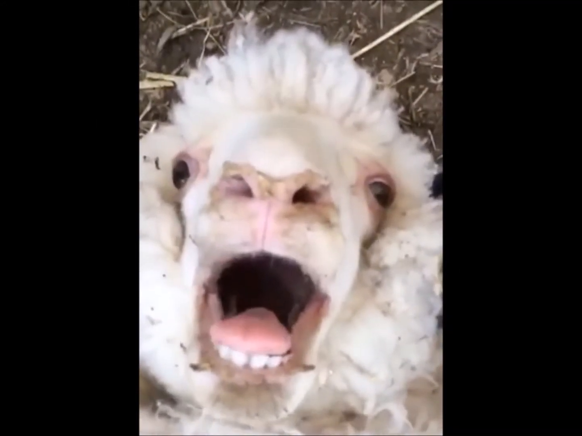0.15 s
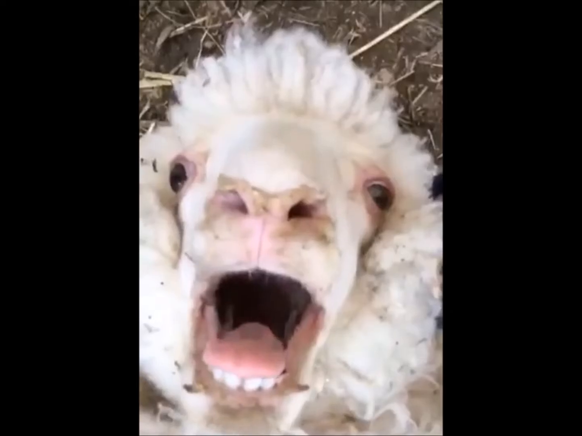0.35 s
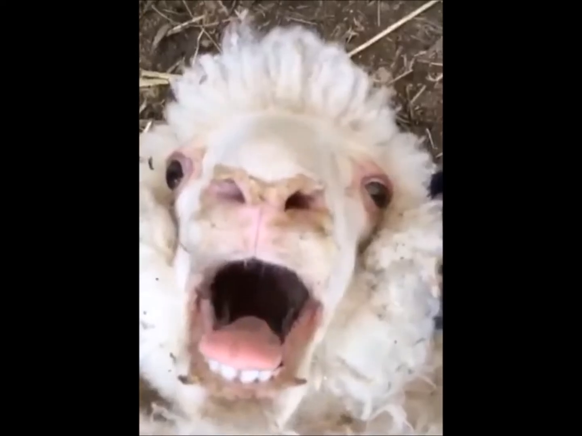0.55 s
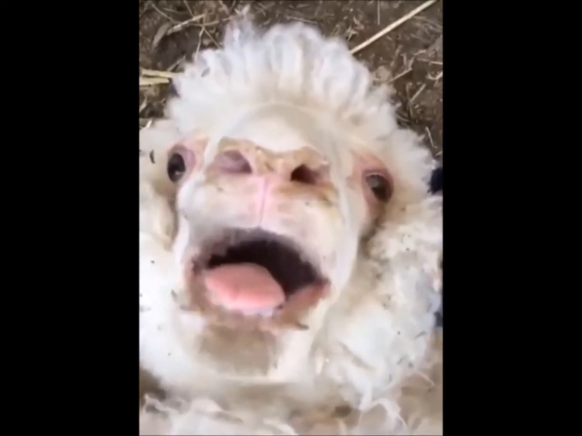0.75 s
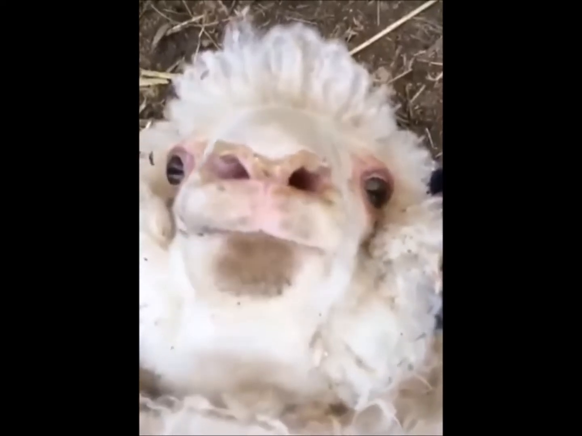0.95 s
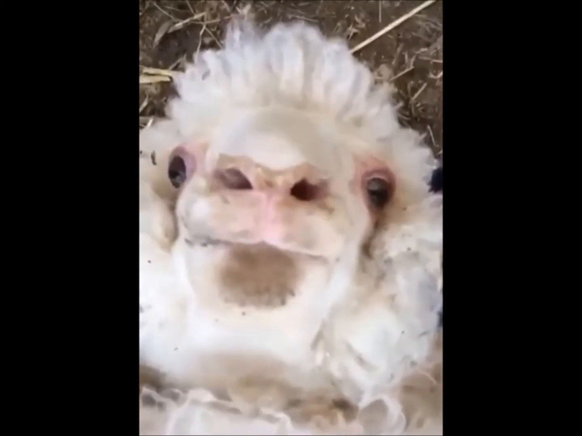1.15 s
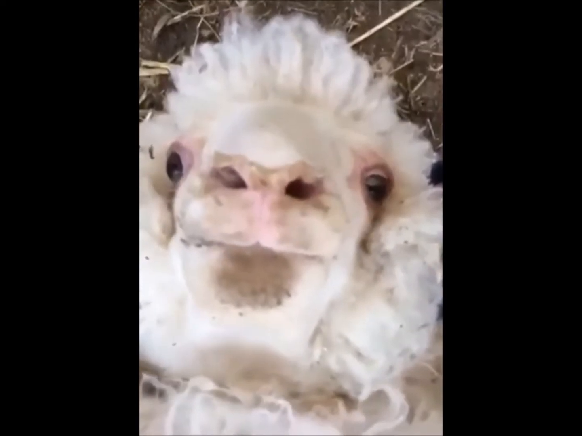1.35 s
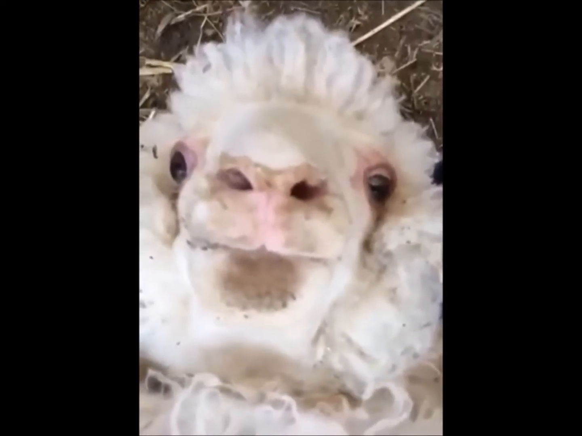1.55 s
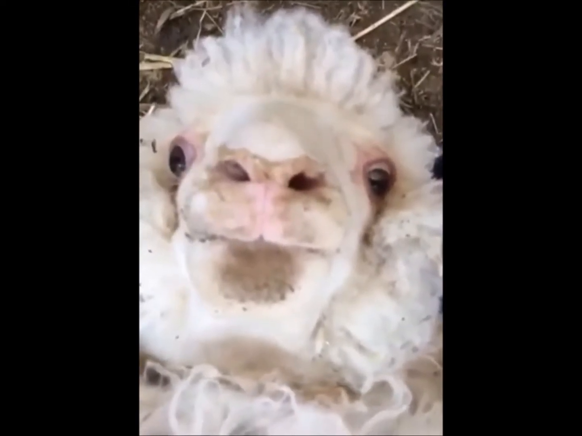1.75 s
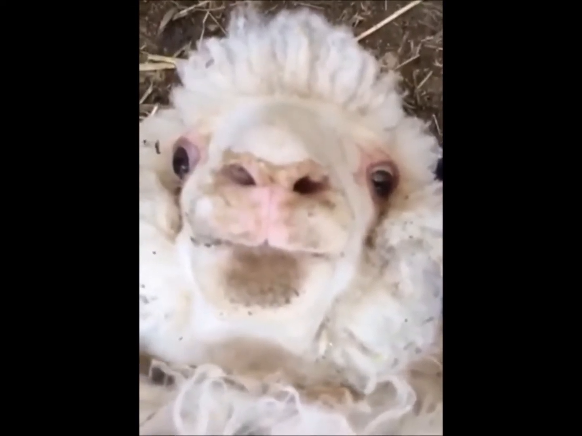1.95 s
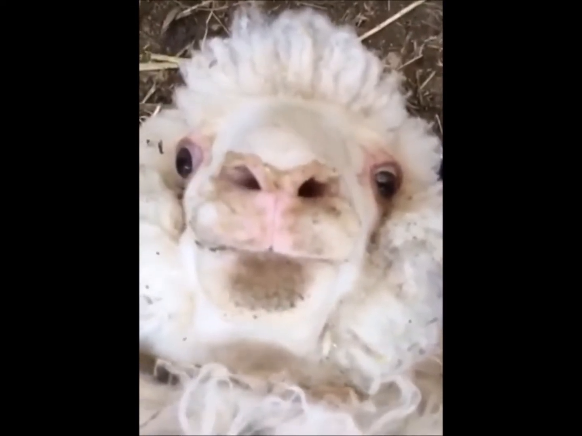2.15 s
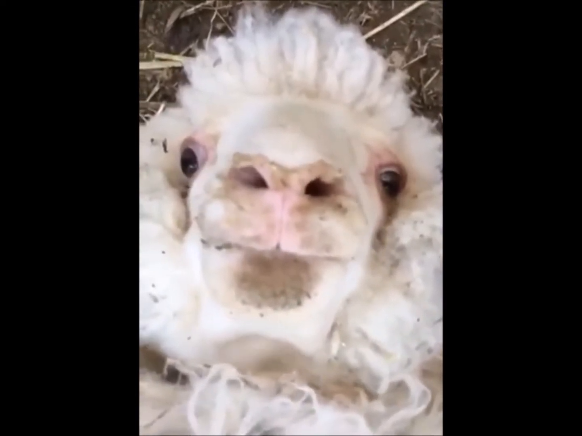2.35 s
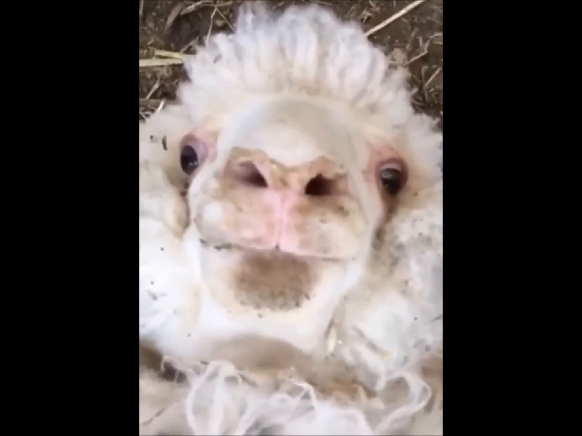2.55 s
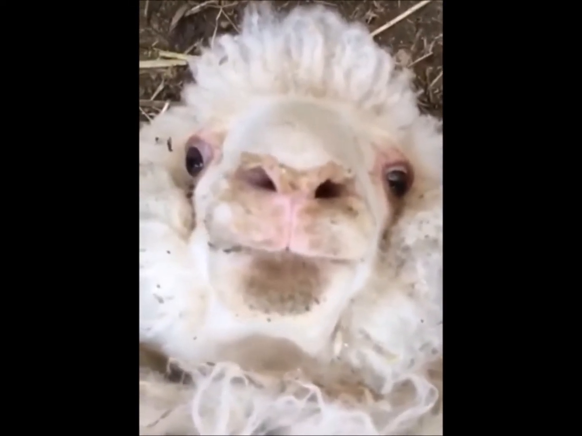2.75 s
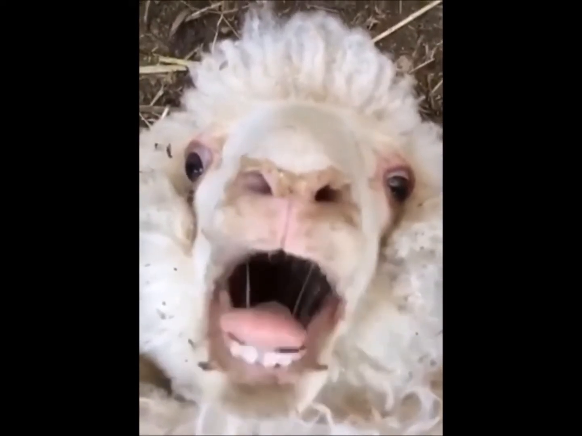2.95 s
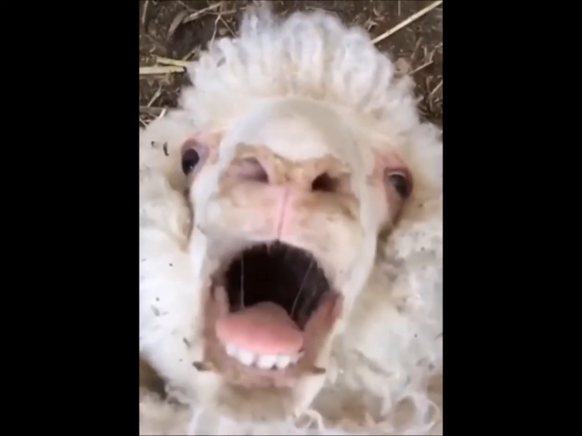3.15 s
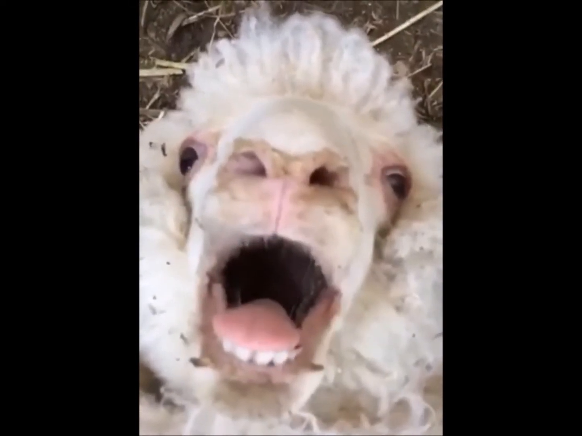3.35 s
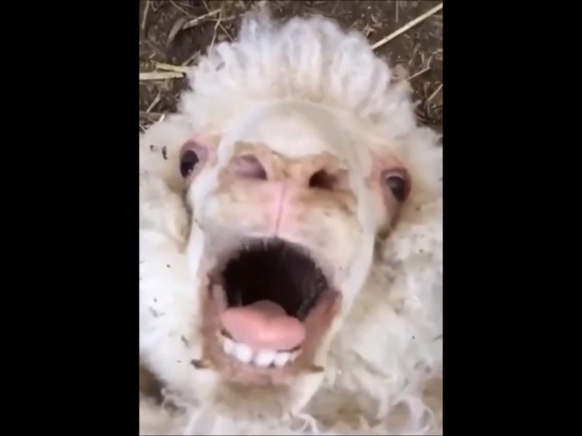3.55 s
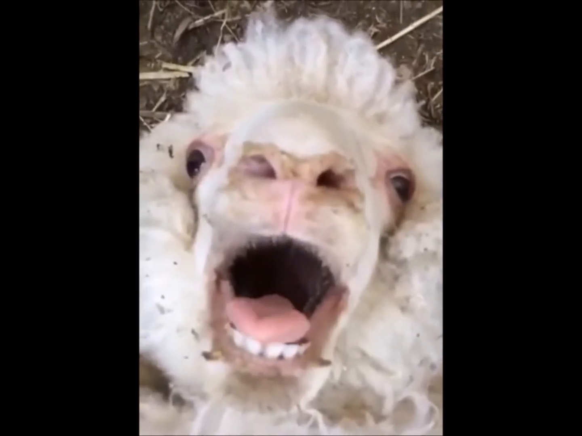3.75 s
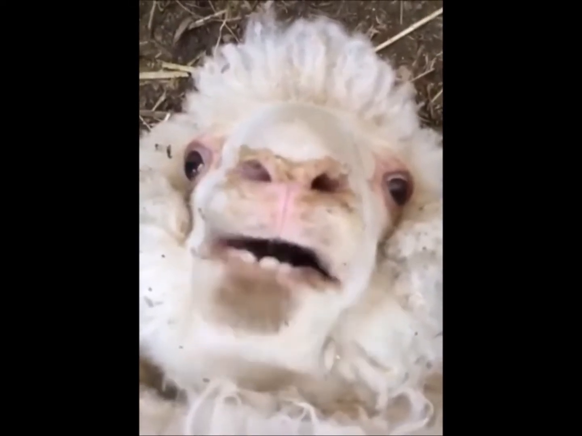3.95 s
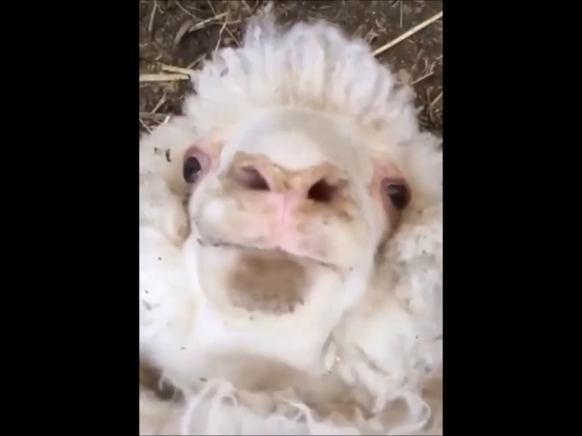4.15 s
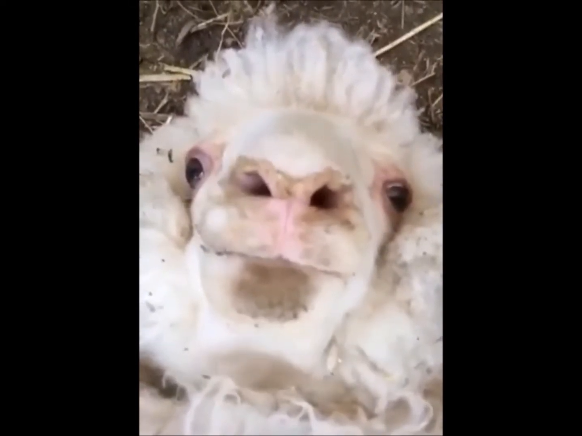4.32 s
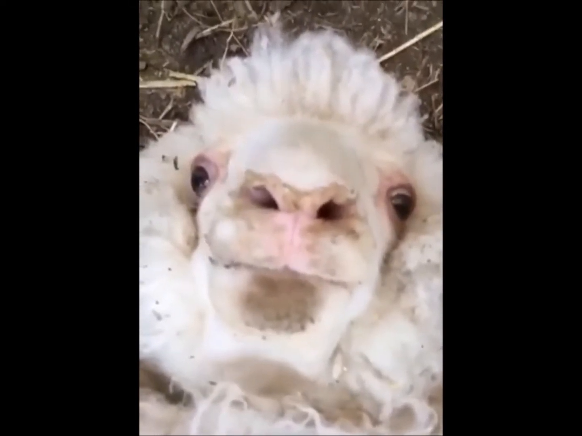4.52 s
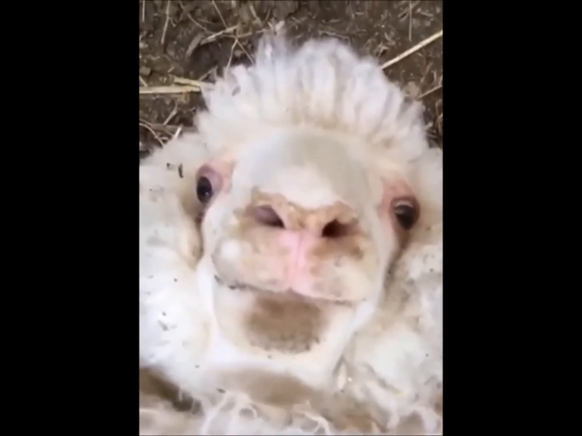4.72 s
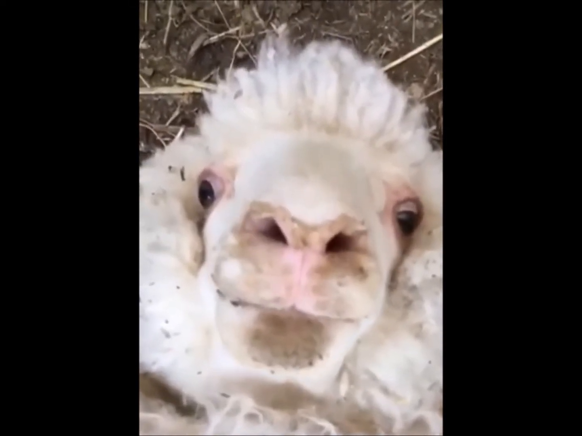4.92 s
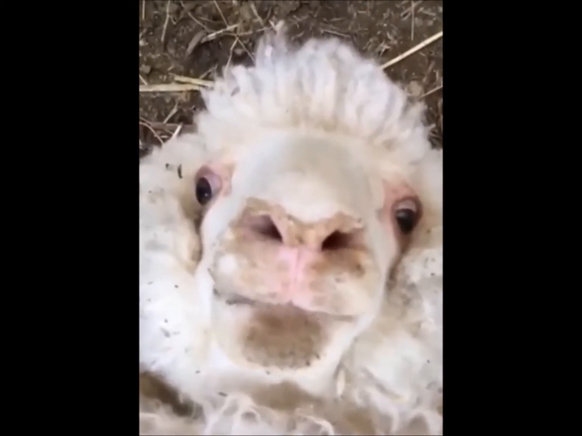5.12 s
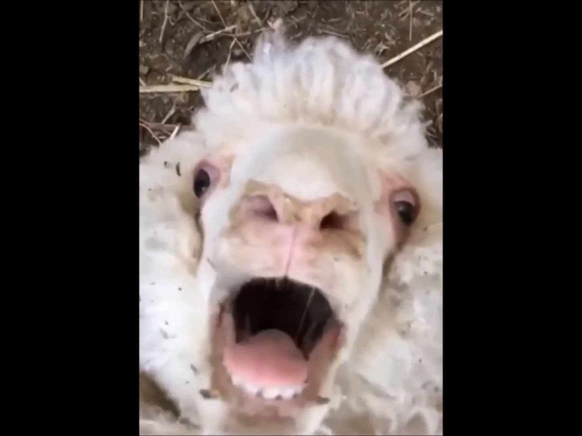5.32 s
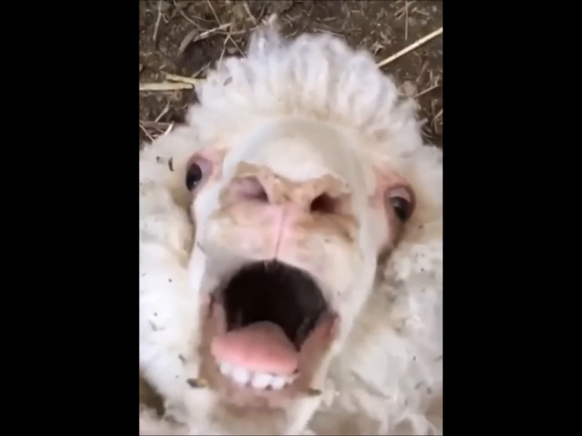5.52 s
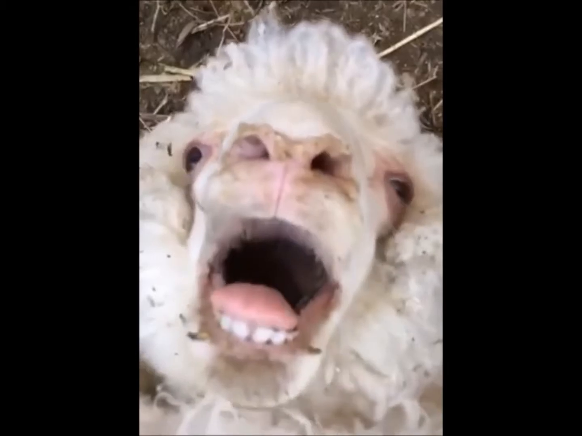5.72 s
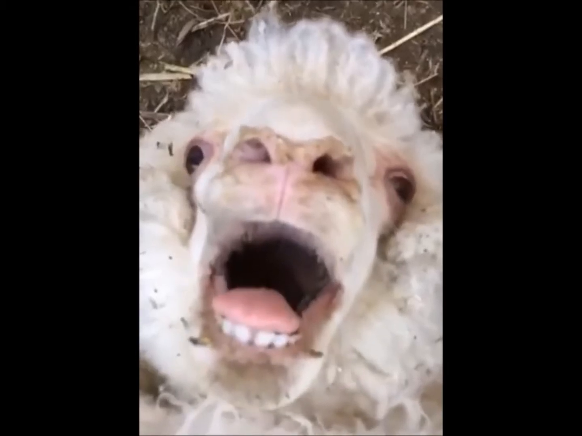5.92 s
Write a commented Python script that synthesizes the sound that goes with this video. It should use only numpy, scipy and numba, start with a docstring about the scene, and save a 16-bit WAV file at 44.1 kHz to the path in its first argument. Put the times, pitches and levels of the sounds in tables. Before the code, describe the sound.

Very close and with almost no echo, a sheep yells a long, buzzing bleat. It then snuffles quietly, with a small snort, little wet mouth sounds and soft thumps. A second loud bleat opens with a rough rattle and smooths into a held tone. After a low thump and more snuffling, a third follows the same way. Faint outdoor air and the rumble of a hand on the microphone lie underneath.

```python
"""Sheep bleating close up

A sheep on straw yells three long bleats into a phone just above its face: vocal-fold pulses through
throat resonances. The second and third start as a harsh rattle, then lock into a clean buzz that sags
in pitch. In between come nose snuffles, a small snort, mouth squelches and soft low thumps, while the
hand on the phone rumbles over quiet yard air."""
import sys
import numpy as np
from scipy import signal
from scipy.fft import rfft, irfft
from scipy.io import wavfile
from scipy.ndimage import uniform_filter1d
from numba import njit

SR = 44100
rng = np.random.default_rng(int(sys.argv[2]) if len(sys.argv) > 2 else 0)


def put_to_file(sound):
    """Save the sound as 16-bit audio at rate SR, in the file named by the first command-line argument."""
    columns = np.atleast_2d(sound).T  # one column per channel
    safe = np.clip(columns, -1, 1)
    whole_steps = np.round(safe * 32767)
    wavfile.write(sys.argv[1], SR, whole_steps.astype(np.int16))


N = 268128
TIME = np.arange(N) / SR
TOP_HZ = 10500

# Each row: bleat start in s, lock from rattle to tone in s, stop in s, level in dB,
# base first and second resonance in Hz, chest band gain in dB.
BLEATS = [(-.6, -.3, .793, -20, 921.5, 1950, -10.5), (2.94, 3.18, 3.908, -20.5, 946.4, 1977, -5),
          (5.249, 5.628, 6.4, -19.5, 925.5, 2008, -3.5)]
# Air let go as the throat opens or gives out. Each row: time in s, level in dB, decay in s.
COUGHS = [(0.796, -43.5, 0.015), (2.912, -29, 0.023), (3.918, -38.5, .014), (5.218, -46.5, .02),
          (5.239, -28, 0.0074)]


def undb(db):
    """Decibels to gain."""
    return 10 ** (np.asarray(db) / 20)


def unit(x):
    """Scale to rms 1."""
    return x / np.sqrt(np.mean(x ** 2))


def steady(x, size=560):
    """Hold the running rms at 1."""
    power = uniform_filter1d(uniform_filter1d(x ** 2, size), size)
    return x / np.sqrt(np.abs(power) + 1e-12)


def curves(rows):
    """Interpolate each column over the times in the first."""
    times_s, *columns = np.transpose(rows)
    return [np.interp(TIME, times_s, column) for column in columns]


def bleat_index():
    """Bleat number per sample, switching halfway through each pause."""
    return np.searchsorted([(a[2] + b[0]) / 2 for a, b in zip(BLEATS, BLEATS[1:])], TIME)


def bleat_curves(tables):
    """Curves from one table per bleat."""
    return np.choose(bleat_index(), [np.array(curves(rows)) for rows in tables])


def wander(rate_hz):
    """Gaussian values joined by straight lines."""
    return np.interp(TIME * rate_hz, np.arange(4096), rng.standard_normal(4096))


def fall(t, decay_s):
    """1 until t = 0, then exponential decay."""
    return np.exp(-np.clip(t / decay_s, 0, 60))


def envelope(start_s, stop_s, attack_s, release_s):
    """Linear attack, hold, exponential release."""
    return np.clip((TIME - start_s) / attack_s, 0, 1) * fall(TIME - stop_s, release_s)


def swell(at_s, half_s):
    """Gaussian rise and fall."""
    return fall((TIME - at_s) ** 2, half_s ** 2)


def gust(at_s, decay_s, rise_s=.0035):
    """Exponential rise to a peak, then decay."""
    return fall(at_s - TIME, rise_s) * fall(TIME - at_s, decay_s)


def band(x, lo_hz, hi_hz, order=4):
    """Zero-phase band-pass."""
    sos = signal.butter(order, [lo_hz, min(hi_hz, SR / 2 - 1)], "band", fs=SR, output="sos")
    return signal.sosfiltfilt(sos, x)


def lows(x, top_hz):
    """Zero-phase low-pass."""
    return signal.sosfiltfilt(signal.butter(2, top_hz, fs=SR, output="sos"), x)


def colour(x, points, size=4096):
    """Minimum-phase filter through (Hz, dB) points."""
    hz, db = np.transpose(points)
    gain_db = np.interp(np.log(np.fft.rfftfreq(size, 1 / SR) + 1), np.log(hz), db)
    cepstrum = irfft(np.log(undb(gain_db)))
    cepstrum[1:size // 2] *= 2
    cepstrum[size // 2 + 1:] = 0
    return signal.fftconvolve(x, irfft(np.exp(rfft(cepstrum))))[:len(x)]


@njit
def resonate(x, hz, width_hz):
    """Moving state-variable band-pass, gain 1 at the centre."""
    y, band_state, low_state = np.empty(len(x)), 0., 0.
    for i in range(len(x)):
        g, damping = np.tan(np.pi * hz[i] / SR), width_hz[i] / hz[i]
        passed = (band_state + g * (x[i] - low_state)) / (1 + g * (g + damping))
        band_state = 2 * passed - band_state
        low_state += 2 * g * passed
        y[i] = damping * passed
    return y


def bell(x, hz, width_hz, db):
    """Boost or cut one band."""
    return x + (undb(db) - 1) * resonate(x, np.full(N, hz * 1.), np.full(N, width_hz * 1.))


def bells(x, rows, amount=1):
    """Bells in series, their dB scaled by amount."""
    for hz, width_hz, db in rows:
        x = bell(x, hz, width_hz, db * amount)
    return x


def clicks(at, sizes, order=8):
    """Sinc pulses at fractional sample positions."""
    taps = at.astype(int)[:, None] + np.arange(1 - order, order + 1)
    offset = taps - at[:, None]
    shape = np.sinc(offset) * np.sinc(offset / order)
    return np.bincount(np.clip(taps, 0, N - 1).ravel(), (sizes[:, None] * shape).ravel(), N)


def folds(pitch_hz, rough, throat_hz):
    """Folds snap shut once a cycle and puff air; strained, they jitter, rebound and follow the throat."""
    jitter_s, clean_scatter_db, rough_scatter_db = .0005, .35, 3.2
    rebound_share, rebound_s, rebound_spread_s = .3, .0026, .0006
    puff_s, hiss_db, rasp_db, cough_air_db = .0035, -31, -26.5, -10.5
    cycles = np.cumsum(pitch_hz) / SR
    due = np.interp(np.arange(int(cycles[-1])), cycles, np.arange(N))
    strain = rough[due.astype(int)]
    slip, force, bounce, delay = rng.standard_normal((2048, 4))[:len(due)].T
    slip = signal.lfilter([1], [1, -.4], slip)  # a late snap delays the next ones
    snaps = due + SR * jitter_s * strain * slip
    # Strain draws each snap to the nearest crest of the first resonance.
    ring_cycles = np.cumsum(throat_hz) / SR
    nearest_cycle = np.round(np.interp(snaps, np.arange(N), ring_cycles))
    crests = np.interp(nearest_cycle, ring_cycles, np.arange(N))
    snaps += np.tanh((strain / .6) ** 2) * (crests - snaps)
    snap_db = (clean_scatter_db + rough_scatter_db * strain) * np.minimum(force, 2)
    rebounds = snaps + SR * (rebound_s + rebound_spread_s * delay)
    pulses = clicks(snaps, undb(snap_db)) + clicks(rebounds, rebound_share * strain * np.abs(bounce))
    # Hard and soft snaps push about the same air.
    pulses += rough * lows(clicks(snaps, np.ones(len(due))) - pulses, top_hz=1300)
    puffs = signal.lfilter([1], [1, -np.exp(-1 / (puff_s * SR))], pulses)
    hiss = undb(hiss_db) * band(rng.standard_normal(N), 2800, TOP_HZ, order=2)
    cough_air = undb(cough_air_db) * sum(gust(at_s, decay_s=.014) for at_s, _, _ in COUGHS)
    rasp = (undb(rasp_db) * rough * puffs + cough_air) * rng.standard_normal(N)
    ragged = pulses + puffs * hiss + rasp
    # The slow swing of the folds stays more even than their snaps.
    even = clicks(due, np.ones(len(due)))
    return ragged + .85 * rough * lows(even - ragged, top_hz=340)


def throat(source, rough, centres_hz, jaw, nose, opening):
    """Three resonances in series; rattle blurs them, the open nose damps them and adds its own."""
    # Broad voice spectrum. Each row: frequency in Hz, gain in dB.
    voice_colour = [(70, -30), (120, -0.5), (170, 6), (350, -0.5), (700, -3), (1100, -2.5), (1500, 0),
                    (2100, 3), (2800, -1.5), (3200, -2.5), (3650, -4.5), (4400, -5.5), (6000, -2.5),
                    (7400, -5), (9300, -4.5), (10500, -16)]
    # Each row, in Hz: clean width, extra in full rattle, extra with open nose, skirt width.
    resonance_widths = [(27.3, 25, 73, 810), (37, 200, 220, 644), (88, 100, 70, 600)]
    # Small throat and mouth cavities. Each row: centre in Hz, width in Hz, gain in dB.
    pockets = [(1455, 240, -4.5), (3180, 160, 2.5), (3780, 150, -7.5), (7470, 700, -5.5), (9770, 600, 4.5)]
    x = colour(source, voice_colour)
    x = x - 2 * resonate(x, np.full(N, 3000.), np.full(N, 1800.))  # all-pass spreads each snap
    for hz, (clean_hz, blur_hz, damp_hz, skirt_hz) in zip(centres_hz, resonance_widths):
        width_hz = clean_hz + blur_hz * rough + damp_hz * nose ** 2 + 206 * opening
        shaken_hz = hz * (1 + .04 * rough * wander(160))  # strain shakes the throat walls
        x = x + (skirt_hz / width_hz - 1) * resonate(x, shaken_hz, width_hz)
    for hz, width_hz, db in pockets:
        drifting_hz = hz * (1 - .031 * (jaw - .5) + .02 * wander(4))
        shimmer_db = 2 * wander(12)
        x = bell(x, drifting_hz, width_hz, db * (1 - rough) + shimmer_db)
    nasal_db = -1 + 14.5 * nose + 10 * opening
    return bell(x, hz=500, width_hz=150, db=nasal_db)


def tongue(x, held, width_hz=43):
    """The tongue position gives each held tone its own narrow peaks and notches."""
    # One list per bleat. Each row: centre in Hz, gain in dB.
    tongue_bands = [
        [(1290, 3), (2030, -0.5), (3560, -10)],
        [(2140, -12.5)],
        [(1450, -8), (1810, 3.5), (2350, 3), (3070, 6)],
    ]
    shaped = [bells(x, [(hz, width_hz, db) for hz, db in rows], held) for rows in tongue_bands]
    return np.choose(bleat_index(), shaped)


def grain(x, lo_hz, rough, spacing_hz=450):
    """Treble bands flicker independently, faster and deeper in a rattle."""
    for hz in np.arange(lo_hz, TOP_HZ, spacing_hz):
        flicker_db = 3.4 * wander(32) + 4.5 * rough * wander(130)
        x = bell(x, hz, spacing_hz / 2, flicker_db)
    return x


def high_ring(source, width_hz=180.):
    """The snaps kick a thin, high throat resonance that comes and goes."""
    # Each row: time in s, frequency in Hz, level in dB, half length in s.
    ring_swells = [(0.074, 8280, -53, 0.12), (3.282, 7920, -39.5, 0.2), (5.626, 7760, -42.5, 0.1),
                   (5.89, 8143, -38, 0.2)]
    ring_hz = curves(ring_swells)[0]
    gain = sum(undb(db) * swell(at_s, half_s) for at_s, _, db, half_s in ring_swells)
    return gain * steady(resonate(source, ring_hz, np.full(N, width_hz)))


def bleats():
    """Fold pulses through the throat: a cough, a rattle scooping up to pitch, a held buzz, a slack end."""
    # Fold strain. Each row, one per bleat: rattle roughness, held roughness, burst force, all 0-1.
    strain = [(1, .012, 1), (1, .017, 1), (.72, .032, .7)]
    # One list per bleat. Each row: time in s, jaw opening 0-1, nose opening 0-1.
    mouth = [
        [(.05, 0.7, 0.39), (.25, 0.74, 0.38), (.38, 0.99, 0.3), (.6, 0.81, 0.43), (.72, .68, 0.3),
         (.8, 0.85, 0.74)],
        [(3, 0.9, 0.1), (3.2, 0.74, 0.01), (3.3, 0.55, 0.18), (3.72, 0.79, 0.51), (3.88, 0.24, 0.83)],
        [(5.28, 1, 0.1), (5.52, 1, 0), (5.76, 0.43, 0.47), (6.05, 0.67, 0.25)],
    ]
    # One list per bleat. Each row: time in s, held pitch in Hz.
    held_pitch = [
        [(0.0, 182.5), (0.21, 179), (0.438, 185.6), (0.626, 184.6), (0.728, 178.1), (0.772, 166.3),
         (0.79, 156.7)],
        [(3.21, 175.7), (3.36, 177.6), (3.498, 177.7), (3.742, 173), (3.92, 157.8)],
        [(5.652, 184.2), (5.748, 184.1), (5.778, 182), (6.07, 177.9)],
    ]
    # Voice cracks. Each row: time in s, dip in dB, added roughness 0-1, third resonance jump in Hz.
    catches = [(0.728, -21, .06, 1), (3.033, -25.5, 0, 600), (3.14, -38, 0.08, -62), (3.204, -33, 0, 0.5),
               (3.868, -22, .14, 59), (5.464, -29, 0.01, 150), (5.571, -22, 0, 0), (5.618, -24, 0.07, -7)]
    # Tight throat, opening burst, narrowing lips. Each row: centre in Hz, width in Hz, gain in dB.
    rattle_bands = [(960, 300, 2.5), (5060, 1500, -0.5), (7100, 1100, 6.5)]
    burst_bands = [(400, 350, 9.5), (1750, 610, -8), (4966, 680, 16)]
    closing_bands = [(1150, 500, 1.5), (2470, 900, -9)]
    split_hz, opening_s, crack_s = 3700, .012, .015

    start_s, lock_s, stop_s, level_db, first_hz, second_hz, chest_db = np.array(BLEATS)[bleat_index()].T
    rattle, held_rough, burst_force = np.array(strain)[bleat_index()].T
    jaw, nose = np.clip(bleat_curves(mouth), 0, 1)
    held_hz, = bleat_curves(held_pitch)
    age_s, left_s = TIME - start_s, stop_s - TIME
    opening, burst = fall(age_s, opening_s), burst_force * fall(age_s, .045)
    closing, slack = fall(left_s, .016), fall(left_s, .12)

    clearing_s = .085 * (lock_s - start_s)  # a long rattle clears slowly
    unlocked = (1 - np.tanh((TIME - lock_s) / clearing_s / 2)) / 2
    crack_rough = sum(extra * swell(at_s, crack_s) for at_s, _, extra, _ in catches)
    rough = np.clip(held_rough + rattle * unlocked + .15 * fall(left_s, .035) + crack_rough, 0, 1)
    jump_hz = sum(hz * swell(at_s, crack_s) for at_s, _, _, hz in catches)
    catch_db = sum(db * swell(at_s, half_s=.005) for at_s, db, _, _ in catches)

    lurch = rough * wander(45)  # a rattling larynx jerks pitch and vowel together
    vowel_ratio = 1 + .05 * lurch
    scoop = .17 * fall(age_s, .06)
    pitch_hz = held_hz * (1 - scoop + .002 * wander(30) + .018 * lurch)
    source = folds(pitch_hz, rough, first_hz * vowel_ratio)

    centres_hz = [first_hz + 79.9 * closing,
                  (second_hz - 146 * jaw + 165 * rough + jump_hz / 2) * vowel_ratio,
                  (2779 - 416.8 * jaw + jump_hz) * vowel_ratio]
    voice = throat(source, rough, centres_hz, jaw, nose, opening)
    voice = bell(voice, hz=165, width_hz=80, db=chest_db)
    voice = tongue(voice, held=1 - rough)
    voice = grain(voice, split_hz, rough)
    voice = bells(voice, rattle_bands, rough)
    voice = bells(voice, burst_bands, burst * fall(-age_s, opening_s))
    voice = bells(voice, closing_bands, closing)
    voice = bell(voice, hz=3500, width_hz=1100, db=catch_db)

    treble = band(voice, split_hz, 2 * TOP_HZ)
    treble_db = -17.5 + 10.5 * burst - 3 * slack + catch_db
    voice = steady(voice - treble) + undb(treble_db) * steady(treble)
    # Rattle, an open nose and failing breath all cost loudness.
    effort_db = -2.5 * rough - 6 * nose ** 2 - 3.5 * fall(left_s, .0062)
    effort = undb(effort_db) * envelope(start_s, stop_s, attack_s=.013, release_s=.0049)
    coughs = sum(undb(db) * gust(at_s, decay_s) for at_s, db, decay_s in COUGHS)
    return (undb(level_db) * effort + coughs) * voice + effort * high_ring(source)


def pen_echo(x):
    """Quick scatter off the ground, a faint dull echo of the pen, treble scatter off the straw."""
    t = TIME[:SR]

    def tail(noise, db, t60_s, delay_s):
        decay = noise * undb(-60 * t / t60_s) * (t > delay_s)
        return undb(db) * decay / np.linalg.norm(decay)

    ground, pen, straw = rng.standard_normal((3, SR))
    response = tail(ground, db=-21, t60_s=.05, delay_s=.003)
    response += tail(band(pen, 300, 4800, order=1), db=-52, t60_s=.4, delay_s=.015)
    response += tail(band(straw, 3500, 2 * TOP_HZ, order=2), db=-14, t60_s=.02, delay_s=.001)
    return signal.fftconvolve(x, response)[:N]


def yard_air(level_db=-67.5):
    """Quiet, steady, dull noise."""
    spectrum_hz_db = [(60, -13), (120, -8), (300, -21), (700, -23), (1500, -32), (10000, -46.5)]
    return undb(level_db) * unit(colour(rng.standard_normal(N), spectrum_hz_db))


def hand_rumble():
    """Low noise from the hand on the phone, strongest between bleats."""
    # Each row: time in s, level in dB.
    rumble_levels = [(0.49, -77.5), (2.25, -58.5), (2.95, -57), (3.27, -75), (3.79, -72), (4.06, -58),
                     (5.2, -56), (5.79, -70), (6.08, -72)]
    # Each row: frequency in Hz, gain in dB.
    rumble_colour = [(20, -19.5), (50, -7.5), (70, 3), (110, -5.5), (250, -53)]
    level_db, = curves(rumble_levels)
    return undb(level_db) * unit(colour(rng.standard_normal(N), rumble_colour))


def snuffles():
    """Fluttering turbulence rings the nasal passages; a gentle puff hisses less than a snort."""
    # Each row: start in s, length in s, level in dB, resonance in Hz.
    puffs = [(0.83, 0.1, -72, 3450), (1.021, 0.033, -64, 1915), (1.033, 0.029, -63.5, 3780),
             (1.061, 0.23, -58, 1214), (1.302, 0.19, -70, 3290), (2.128, 0.21, -71, 1895),
             (2.304, 0.025, -66, 4230), (2.478, 0.074, -62, 4150), (4.25, 0.16, -74.5, 1850),
             (4.426, 0.05, -68.5, 2410), (4.547, 0.04, -66.5, 1900), (4.735, 0.033, -68, 2440),
             (4.827, 0.38, -73.5, 1792)]
    # Nasal resonances. Each row: centre in Hz, width in Hz, gain in dB.
    nose_modes = [(326, 21, 13), (906, 42, 9.5), (1230, 60, 7), (1970, 80, 5.5), (3080, 49, 2.5),
                  (3720, 23, 10), (5040, 110, 6.5)]
    # Airflow spectrum. Each row: frequency in Hz, gain in dB.
    nose_colour = [(100, -16), (330, -12.5), (600, -8), (1200, -13.5), (1600, -14.5), (2700, -19),
                   (3900, -16.5), (10000, -21.5)]
    air = bells(colour(rng.standard_normal(N), nose_colour), nose_modes)
    hiss = band(air, 2200, 2 * TOP_HZ, order=1)
    loudest_db = max(db for _, _, db, _ in puffs)
    out = np.zeros(N)
    for start_s, length_s, db, hz in puffs:
        hiss_db = .38 * (db - loudest_db)
        puff = bell(air - hiss + undb(hiss_db) * hiss, hz, width_hz=170, db=13)
        shape = envelope(start_s, start_s + length_s, attack_s=.0091, release_s=.018)
        out += undb(db) * shape * unit(puff)
    flutter_db = 2.6 * wander(45)
    return out * undb(flutter_db)


def thumps_and_squelches():
    """Soft low thumps, plus the sheep's small snort and mouth squelches: damped tones mixed with noise."""
    # Each row: start in s, level in dB, frequency in Hz, rise and decay time in s,
    # relative glide per s, noise share 0-1.
    events = [(1.078, -44, 1220, .007, 2, .2), (1.212, -37.5, 157, 0.017, 2, 0.27),
              (1.924, -48, 875, 0.0082, 0.5, 0.12), (2.33, -44, 201.2, 0.0083, 4, 0.54),
              (2.595, -37, 381, 0.0025, -17, 1), (2.66, -44.5, 349, 0.011, 11, 0.22),
              (2.769, -53, 988.4, 0.0029, -1, 1), (4.104, -25, 118.5, 0.00863, 2, 0.66),
              (4.444, -46.5, 185, 0.019, 1.5, .4), (4.558, -51, 214.4, 0.022, 0, 0.29),
              (4.755, -55, 2400, 0.013, -1.5, 0.26)]
    t = TIME[:SR // 5]
    out = np.zeros(N)
    for start_s, db, hz, swell_s, glide, noisy in events:
        shape = np.minimum(t / swell_s, np.exp(1 - t / swell_s))
        tone = np.sin(2 * np.pi * hz * (t + glide * t ** 2 / 2))
        noise = unit(band(rng.standard_normal(len(t)), hz / 2, hz * 2, order=2))
        start = int(start_s * SR)
        out[start:start + len(t)] += undb(db) * shape * ((1 - noisy) * tone + noisy * noise / 2)
    return out


def scene():
    """The sheep close up in its pen, with soft thumps, hand rumble and yard air; mono."""
    sheep = bleats() + snuffles()
    return (sheep + pen_echo(sheep) + thumps_and_squelches() + hand_rumble() + yard_air())[None]


def record(dry):
    """The phone rounds the tallest peaks and cuts the top."""
    ceiling, knee = .33, 8
    limited = dry / (1 + np.abs(dry / ceiling) ** knee) ** (1 / knee)
    return signal.sosfilt(signal.ellip(8, .2, 70, TOP_HZ, fs=SR, output="sos"), limited)


dry = scene()
out = record(dry)
put_to_file(out)
```